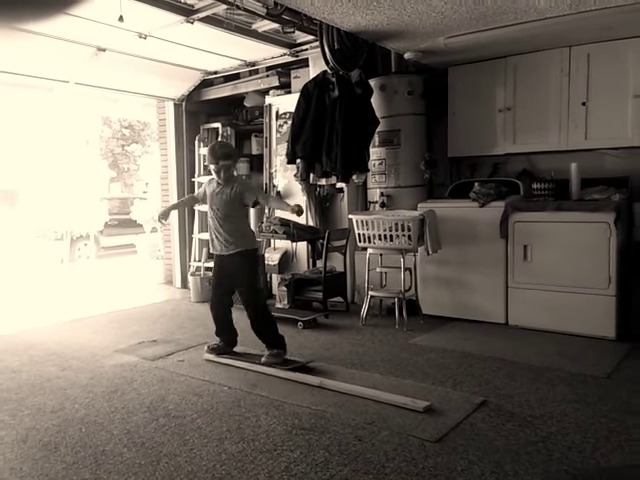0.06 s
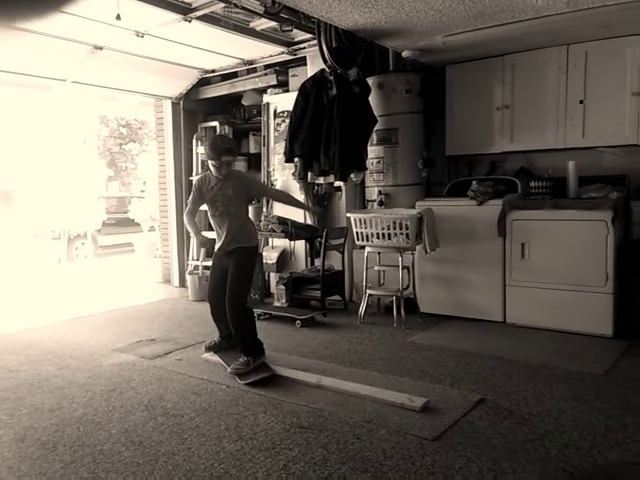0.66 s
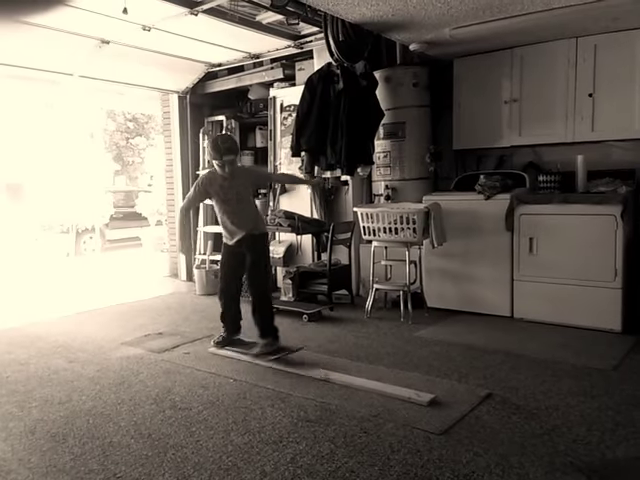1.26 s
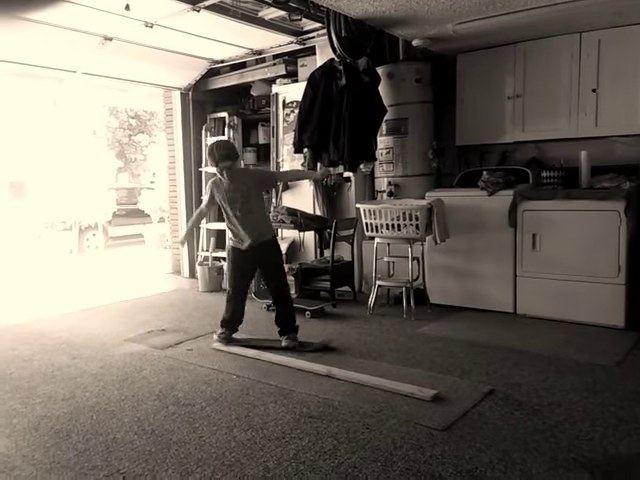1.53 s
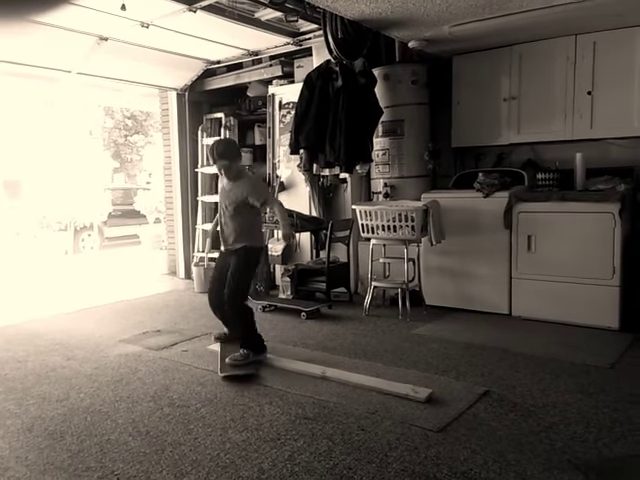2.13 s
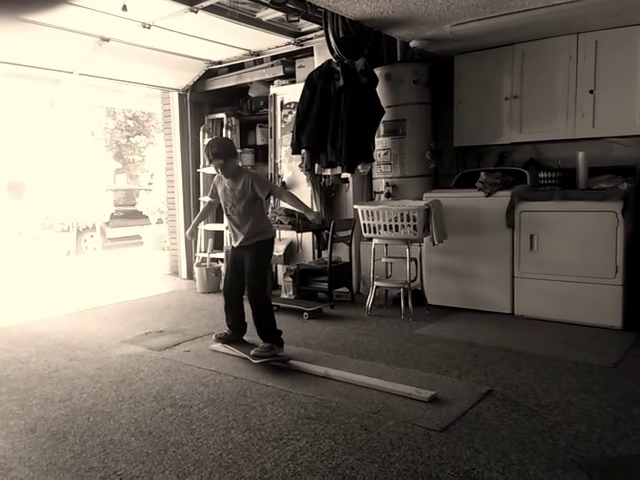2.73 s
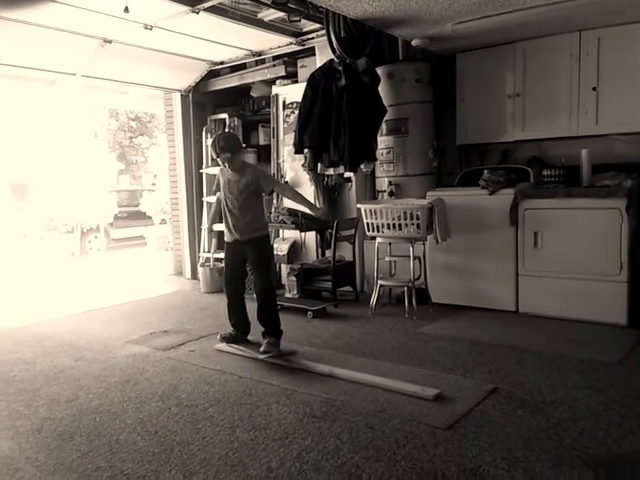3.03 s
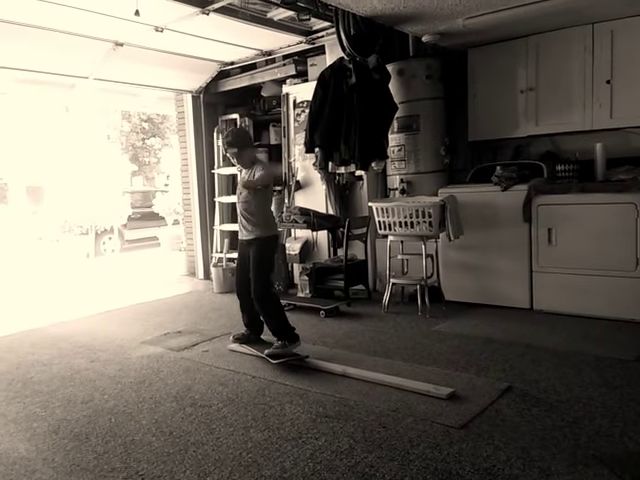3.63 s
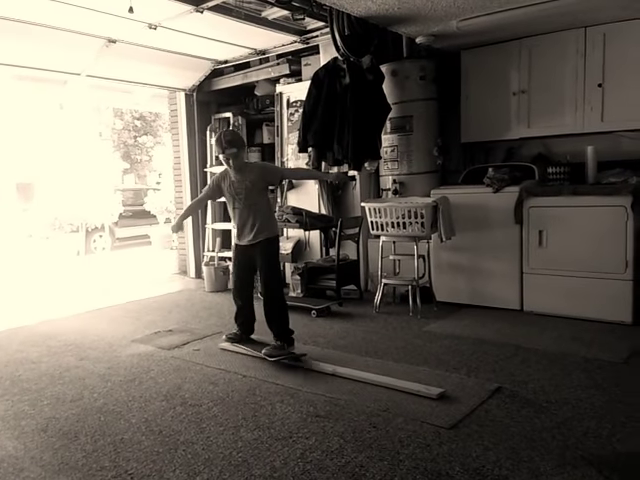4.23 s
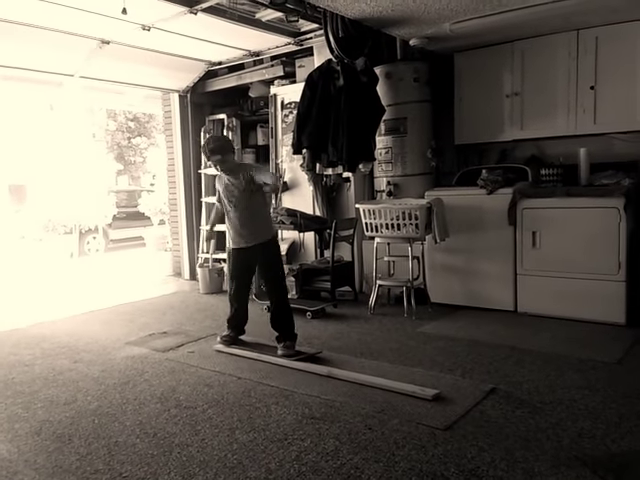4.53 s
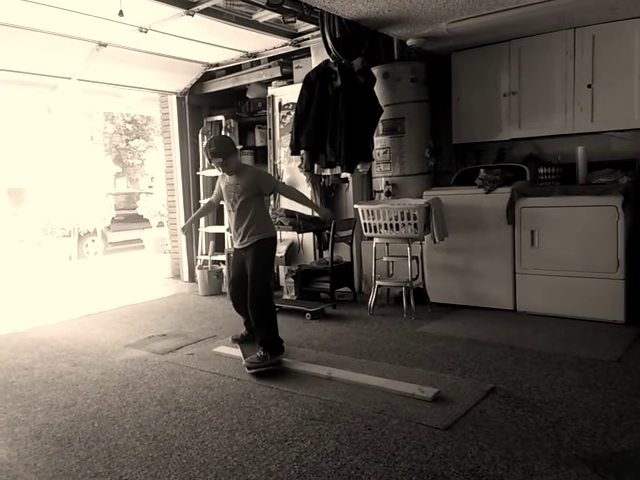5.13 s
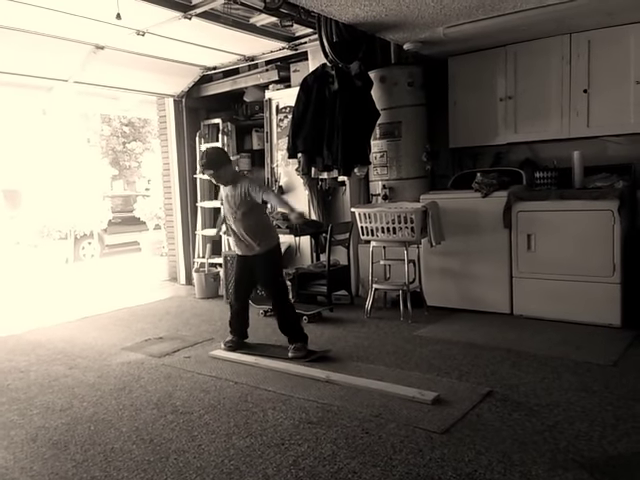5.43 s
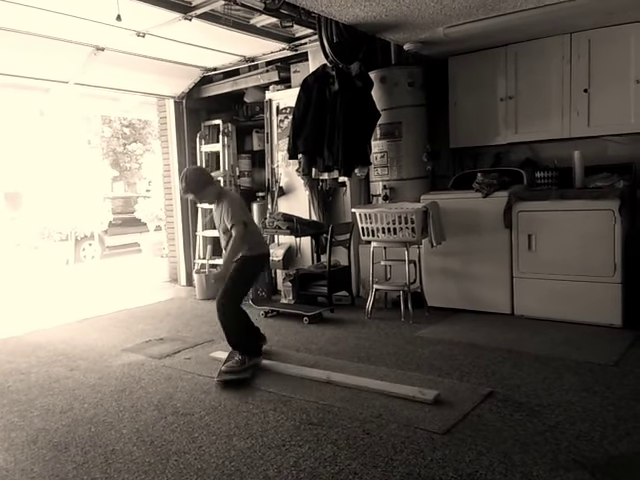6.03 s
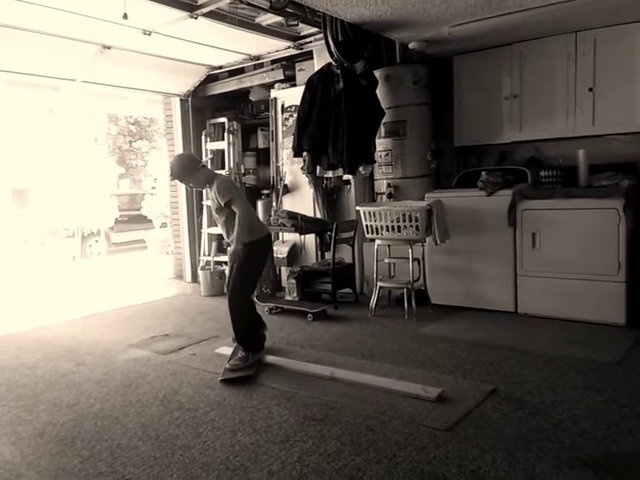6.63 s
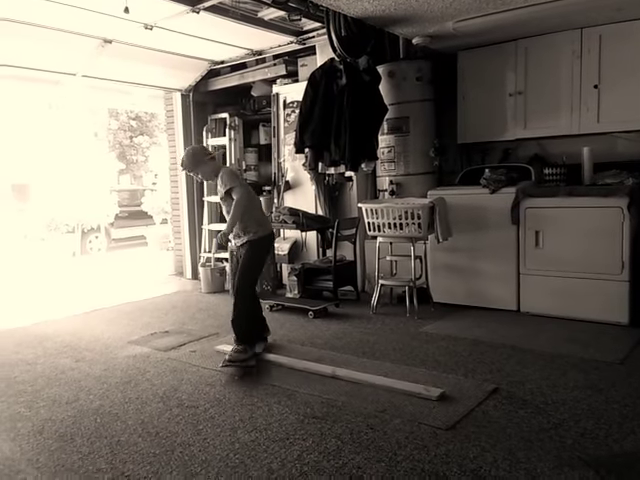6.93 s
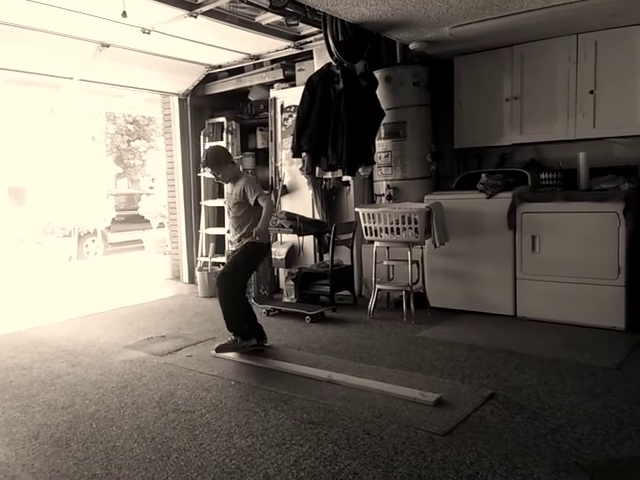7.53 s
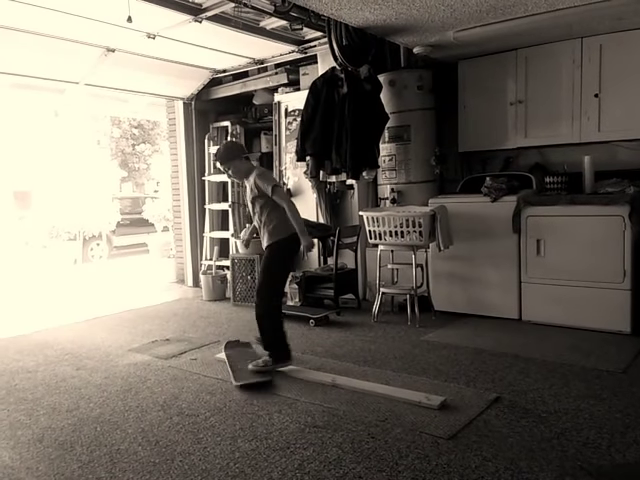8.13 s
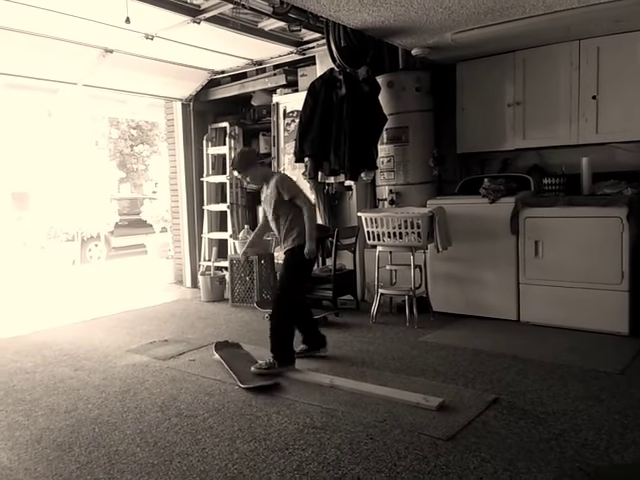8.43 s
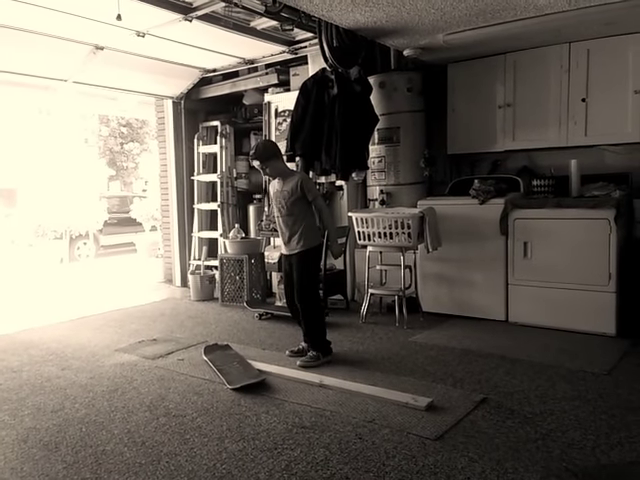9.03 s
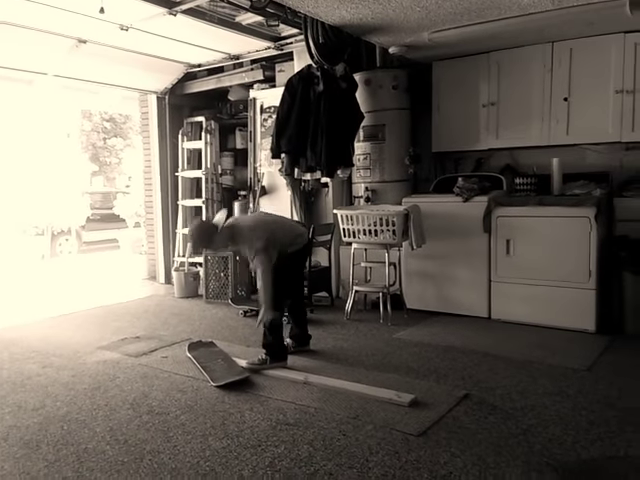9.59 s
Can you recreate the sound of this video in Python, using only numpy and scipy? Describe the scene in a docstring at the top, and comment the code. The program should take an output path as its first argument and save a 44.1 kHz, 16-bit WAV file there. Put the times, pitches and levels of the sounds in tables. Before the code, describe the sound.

In an open garage, a skateboard knocks against a wooden plank and the floor. Sharp clacks come singly or in quick clusters every second or so, with shoes scuffing the grip tape and dull thuds of landings between them. Near the end the board crashes down in a loud clatter, followed by softer steps. The room adds a short echo, over a low appliance hum, soft outdoor air and a faint bird.

```python
"""First you hear a faint bird, a low appliance hum and a sharp clack: a skateboarder is trying tricks
on a wooden plank on the floor of an open garage. Tail, wheels and trucks (the metal axles) knock the
deck and the plank and make them ring. Shoes scuff the grip tape, landings make the floor boom, and a
last flip ends in a loud crash. Echoes in the cluttered room smear each blow."""
import sys
import numpy as np
from scipy import signal
from scipy.fft import rfft, irfft
from scipy.io import wavfile
from scipy.ndimage import uniform_filter1d

SR = 44100
rng = np.random.default_rng(int(sys.argv[2]) if len(sys.argv) > 2 else 0)


def unload_audio(sound):
    """Save the sound as a 16-bit wav file, at the path given as the first command line argument."""
    columns = np.transpose(np.atleast_2d(sound))
    # keep every value between -1 and 1, then stretch to whole-number steps
    steps = np.round(np.clip(columns, -1, 1) * 32767)
    wavfile.write(sys.argv[1], SR, steps.astype(np.int16))


N = 434826
RING_TIME_S = np.arange(int(.8 * SR)) / SR  # time axis for one ring or echo

# tone colour of the outdoor air: frequency_hz, gain_db
AIR_COLOUR = [(20, -27.5), (45, -20), (90, -7.5), (125, -8.5), (150, -12), (188, -2.5), (225, -11.5),
              (345, -14), (420, -20), (900, -20.5), (1250, -23.5), (2060, -28), (3000, -32.5), (5800, -34),
              (8000, -40), (15500, -40)]
# tones of the humming appliance: pitch_hz, level_db
HUM_TONES = [(59.5, -78.5), (119, -66), (193.8, -69.5), (349.9, -75.5)]
# how long the garage's echoes take to fade by 60 dB: frequency_hz, fade_s
ECHO_FADES = [(100, 0.24), (260, 0.37), (700, 0.3), (1800, .27), (5000, 0.24), (12000, 0.13)]
# bird whistles, before scene() turns them down: start_s, length_s, start_pitch_hz, level_db
BIRD_WHISTLES = [(.07, .25, 4580, -62), (0.162, 0.31, 5140, -64.5), (2.78, 0.085, 4840, -70),
                 (2.956, 0.34, 4640, -65.5), (2.991, 0.12, 3650, -58.5), (6.751, 0.31, 4520, -67),
                 (7.376, .06, 4500, -67), (7.581, 0.085, 4220, -62.5), (9.394, 0.28, 4700, -59.5)]
# soles sliding on grip tape and floor: peak_s, half_length_s, hiss_db, pressure (0 to 1)
SHOE_SLIDES = [(.2, 0.3, -66, 0), (.97, 0.16, -76.5, .9), (1.262, 0.061, -65, .85),
               (1.464, 0.057, -47.5, .7), (1.79, 0.086, -75, .7), (2.463, 0.062, -52.5, 0.42),
               (3.06, 0.066, -64, 0.75), (3.635, 0.065, -54, 0.43), (3.915, 0.029, -57.5, 0.42),
               (4.074, 0.055, -64.5, .95), (4.3, 0.21, -59.5, 0.41), (4.454, 0.047, -36, 0.26),
               (4.77, 0.17, -66.5, 0.49), (5.17, 0.17, -57.5, .4), (5.345, 0.065, -43, 0.51),
               (5.968, 0.023, -45, 0.93), (6.858, 0.077, -62.5, 0.88), (7.112, 0.014, -61, 0.55),
               (7.653, .09, -61.5, 0.23), (8.2, 0.25, -55.5, .85), (8.47, 0.3, -64, 0.27),
               (8.956, 0.088, -65, 0.39), (9.75, 0.36, -65.5, 0.02)]
# tone colour of hissing grit: frequency_hz, gain_db
GRIT_COLOUR = [(1000, -16), (2050, -2), (2700, -6), (4300, 0), (6100, 0), (7500, -11), (9000, -25),
               (11000, -43), (15500, -53)]
# tone colour of a sole's low rub: frequency_hz, gain_db
RUB_COLOUR = [(100, -24), (300, 1), (900, 2.5), (1400, 1.5), (2100, 0), (2700, -31.5), (7000, -36.5),
              (11000, -50.5)]
# the rider's weight coming down: start_s, length_s, boom_db, hollow_ring_db
RIDER_LANDINGS = [(1.426, 0.14, -45, -36), (2.095, 0.14, -56.5, -36.5), (4.913, .1, -50.5, -49.5),
                  (5.389, 0.19, -40, -27), (6.0, 0.092, -50, -29.5), (7.88, 0.21, -44, -19.5),
                  (8.2, 0.21, -42.5, -34)]
# tone colour of the booming floor: frequency_hz, gain_db
FLOOR_COLOUR = [(25, -26.5), (50, -19.5), (75, -6.5), (115, 1.5), (160, -8.5), (260, -21), (1000, -69)]
# blows of board and feet: start_s, strength_db, contact_ms, rider_weight_db
BOARD_BLOWS = [(0.3143, -17, 0.27, -2.5), (1.434, -39, 1.95, 13.5), (1.531, -48, 0.95, -10),
               (2.081, -33, 1.23, -9), (2.09, -20, 0.43, 3), (2.122, -30.5, 1.4, 5.5),
               (2.151, -20.5, 0.74, -1), (2.53, -24.5, 0.35, 0.5), (3.264, -36.5, 0.72, -1),
               (4.22, -46.5, 0.71, 9), (4.403, -36, 0.76, -4), (4.873, -40, 1.95, 1),
               (4.918, -15, 0.29, -5.5), (5.284, -32.5, 0.64, 0.5), (5.393, -37, 2.1, 12.5),
               (5.422, -16.5, 0.27, 3.5), (5.93, -51, 1.65, 6), (5.979, -35.5, .85, 5),
               (5.996, -20.5, 0.34, -0.5), (6.044, -27, 0.51, 2.5), (6.921, -49, 1.5, -7),
               (7.813, -24.5, 0.93, -1), (7.843, -17, 0.31, -2.5), (7.879, -27.5, 0.56, 14.5),
               (7.911, -20, 0.35, 1), (7.931, -12, .1, 0.5), (7.95, -19, 0.32, 3.5), (7.972, -17.5, .15, 6),
               (7.989, -15.5, 0.52, -1), (8.145, -40, 0.25, 7.5), (8.18, -42.5, 0.22, 11.5),
               (8.225, -33, 0.66, 4), (8.244, -37.5, 0.33, 10.5), (8.32, -43, 3.5, 6),
               (8.67, -38.5, .95, -2), (8.7, -43, 0.95, 6), (8.83, -43.5, 2.2, -4.5),
               (9.478, -55.5, 0.38, 7.5)]
# tones at which deck, plank and trucks ring: pitch_hz, gain_db, fade_s
BOARD_TONES = [(262, -9, .15), (331, -4, .18), (365, -8, .12), (515, -3, .2), (560, -2, .22),
               (612, -1, .15), (666, -1, .18), (725, 0, .16), (883, -2, .2), (950, -4, .15),
               (1035, -4, .18), (1297, -2, .2), (1507, -1, .2), (1660, -4, .2), (1746, -5, .2),
               (1857, -4, .22), (1966, -5, .22), (2067, -3, .22), (3535, -14, .15), (4097, -12, .18),
               (5623, -15, .15), (6050, -16, .15)]
# tone colour of a crack on wood: frequency_hz, gain_db
WOOD_COLOUR = [(40, -48), (145, -20.5), (190, -9.5), (320, -4), (420, -1.5), (600, -3), (1030, 5),
               (1300, 0.5), (2000, -6), (2650, -6), (4000, 2), (6200, -5.5), (7500, -26), (10000, -43),
               (15500, -53)]
# thump, knock, clack and click of a perfectly hard blow: centre_hz, gain_db, weight_share (0 to 1)
BLOW_BANDS = [(250, -6, 0.99), (630, 2.5, 0.2), (1620, 3.5, 0), (4200, 1, 0.2)]
# borders between those four bands: frequency_hz
BAND_EDGES = (400, 1000, 2400)


def gain(db):
    """Turn decibels into a number to multiply by."""
    return 10 ** (np.asarray(db) / 20)


def level(x, db, first=None):
    """Set a sound's average (rms) level, going by all of it or only its `first` samples."""
    return x * gain(db) / np.sqrt(np.mean(x[:first] ** 2))


def fade(fade_s):
    """A curve that dies away by 60 dB in fade_s."""
    return np.exp(-np.log(1000) * RING_TIME_S / fade_s)


def look_up(table, hz):
    """Read between the rows of a table, spacing all octaves evenly."""
    row_hz, value = np.transpose(table)
    return np.interp(np.log(np.maximum(hz, 1)), np.log(row_hz), value)


def colour(x, table, size=2048):
    """Give a sound a tone colour: make some frequencies louder and others softer."""
    gains = gain(look_up(table, np.fft.rfftfreq(size, 1 / SR)))
    # fold the filter's cepstrum so that it never rings ahead of the sound
    cepstrum = irfft(np.log(gains))
    cepstrum[1:size // 2] *= 2
    cepstrum[size // 2 + 1:] = 0
    return signal.fftconvolve(x, irfft(np.exp(rfft(cepstrum))))[:len(x)]


def split(x, edges_hz, order):
    """Cut a sound into bands from bass to treble."""
    bands = []
    for hz in edges_hz:
        bands.append(signal.sosfilt(signal.butter(order, hz, "low", fs=SR, output="sos"), x))
        x = signal.sosfilt(signal.butter(order, hz, "high", fs=SR, output="sos"), x)
    return bands + [x]


def add(track, start_s, sound):
    """Mix a sound into a track."""
    start = max(int(start_s * SR), 0)
    track[start:start + len(sound)] += sound[:max(N - start, 0)]


def wander(count, smooth_samples):
    """A random wiggle of typical size 1; more smoothing makes it slower."""
    return level(uniform_filter1d(rng.standard_normal(count), smooth_samples), 0)


def outdoor_air(level_db=-60):
    """The air outside is a soft, steady rush."""
    return level(colour(rng.standard_normal(N), AIR_COLOUR), level_db)


def appliance_hum(waver=0.13, smooth_samples=8192):
    """An appliance hums with a few low, slightly unsteady tones."""
    out, t = np.zeros(N), np.arange(N) / SR
    for hz, db in HUM_TONES:
        drift = level(uniform_filter1d(wander(N, smooth_samples), smooth_samples), 0)
        out += level(np.sin(2 * np.pi * hz * t + drift) * (1 + waver * drift), db)
    return out


def bird(drop_share=.27, drop_s=.16, quaver=0.018, flutter_db=4.5):
    """A bird's thin, trembling whistles fall in pitch, quickly at first and then more slowly."""
    out = np.zeros(N)
    for start_s, length_s, start_hz, db in BIRD_WHISTLES:
        progress = np.linspace(0, 1, int(length_s * SR))
        wobble = wander(len(RING_TIME_S), smooth_samples=160)[:len(progress)]
        sag = drop_share * (1 - np.exp(-progress * length_s / drop_s))
        hz = start_hz * (1 - sag) * (1 + quaver * wobble)
        loudness = np.sqrt(progress) * (1 - progress) * gain(flutter_db * wobble)
        add(out, start_s, level(np.sin(2 * np.pi * np.cumsum(hz) / SR) * loudness, db))
    return out


def garage_echoes(spots, early_s=.022, early_db=1.5, alike=0.58, shade=.25):
    """Echoes for each spot in the garage: a burst off floor and cupboards, then a fading tail."""
    edges_hz = 125 * 2. ** np.arange(7)
    centres_hz = np.append(edges_hz, 2 * edges_hz[-1]) / np.sqrt(2)
    # spots close together share part of their echoes
    shared = alike * rng.standard_normal(len(RING_TIME_S))
    echoes = shared + rng.standard_normal((spots, len(RING_TIME_S)))
    # the rider is in the way of the direct sound, so the echoes take a few ms to build up
    echoes *= 1 - shade * np.exp(-RING_TIME_S / 0.0045)
    bands = split(echoes, edges_hz, order=3)
    tail = sum(band * fade(look_up(ECHO_FADES, hz)) for band, hz in zip(bands, centres_hz))
    tail *= gain(early_db * (RING_TIME_S < early_s))
    return tail / np.sqrt(np.sum(tail ** 2, axis=1, keepdims=True))


def settling_slides(delay_s=.17, half_s=0.09, relative_db=-45, pressure=0.34):
    """After each blow the wheels roll and the feet settle: one short slide, louder for a stronger blow."""
    return [(start_s + delay_s, half_s, db + relative_db, pressure) for start_s, db, *_ in BOARD_BLOWS]


def scuffs(grains_per_s=4000, spread_db=4, catch_db=5.5, rub_over_hiss_db=15):
    """Grit catches and slips under soles and wheels: tiny clicks blur into a hiss; pressure adds a rub."""
    grains = (rng.random(N) < grains_per_s / SR) * rng.standard_normal(N)
    grains *= gain(spread_db * rng.standard_normal(N))
    # the sole grips and lets go many times a second
    grains *= gain(catch_db * wander(N, smooth_samples=300))
    hiss, rub = colour(grains, GRIT_COLOUR), colour(grains, RUB_COLOUR)
    out, t = np.zeros(N), np.arange(N) / SR
    for peak_s, half_s, db, pressure in SHOE_SLIDES + settling_slides():
        near = np.abs(t - peak_s) < half_s
        swell = np.cos(np.pi / 2 * (t[near] - peak_s) / half_s) ** 2
        out[near] += swell * (level(hiss[near], db) + pressure * level(rub[near], db + rub_over_hiss_db))
    return out


def landings(hollow_hz=193, hollow_fade_s=0.39):
    """Body weight arrives slowly, so the floor gives a dull boom and the garage a low, hollow ring."""
    out = np.zeros(N)
    for start_s, length_s, boom_db, ring_db in RIDER_LANDINGS:
        push = np.sin(np.linspace(0, np.pi, int(length_s * SR)))
        boom = colour(rng.standard_normal(len(RING_TIME_S)), FLOOR_COLOUR)[-len(push):]
        add(out, start_s, level(boom * push, boom_db))
        # the ring builds up under the push and then fades
        swell = signal.fftconvolve(push[::2] ** 2, fade(hollow_fade_s))[:len(RING_TIME_S)]
        tone = np.sin(2 * np.pi * (hollow_hz * RING_TIME_S + rng.random()))
        add(out, start_s, gain(ring_db) * swell / swell.max() * tone)
    return out


def band_levels(strength_db, contact_ms, weight_db, steepness=2.8):
    """How loud each band of a blow is: longer contact takes away treble, the rider's weight adds thump."""
    hz, hard_db, weight_share = np.transpose(BLOW_BANDS)
    cycles_in_contact = hz * contact_ms / 1000
    dulling_db = 10 * np.log10(1 + cycles_in_contact ** (2 * steepness))
    return strength_db + hard_db + weight_share * weight_db - dulling_db


def skateboard(ring_db=-10, ring_rise_s=0.0027, detune=.003, bounce_gain=.35):
    """Each blow is a sharp crack scattered by the room, plus the ring of deck, plank and trucks."""
    hz, tone_db, fades_s = np.transpose(BOARD_TONES)
    ring_shapes = gain(tone_db)[:, None] * np.array([fade(s) for s in fades_s])
    ring_shapes *= 1 - np.exp(-RING_TIME_S / ring_rise_s)
    cracks = garage_echoes(spots=len(BOARD_BLOWS))
    chances = rng.standard_normal((len(BOARD_BLOWS), 3, len(hz)))
    # a wave runs through the wood and bounces back from the far end a few ms later
    bounce_lags = (SR * rng.uniform(.002, .005, len(BOARD_BLOWS))).astype(int)
    blows = []
    for crack, lag, (bend, place, phase) in zip(cracks, bounce_lags, chances):
        crack = crack + bounce_gain * np.pad(crack, (lag, 0))[:-lag]
        # by chance, the rider's weight bends each pitch and the place struck favours some tones
        bent_hz = hz * (1 + detune * bend)
        tones = np.sin(2 * np.pi * (np.outer(bent_hz, RING_TIME_S) + phase[:, None]))
        ring = gain(2 * place) @ (ring_shapes * tones)
        blows.append(level(colour(crack, WOOD_COLOUR), 0) + level(ring, ring_db))
    out = np.zeros(N)
    for (start_s, *contact), *bands in zip(BOARD_BLOWS, *split(np.array(blows), BAND_EDGES, order=7)):
        for band, db in zip(bands, band_levels(*contact)):
            add(out, start_s, level(band, db, first=1300))
    return out


def scene(bird_db=-5):
    """Blows, landings, scuffs and the far bird sound in the garage, over steady air and hum."""
    echoed = signal.fftconvolve(scuffs() + gain(bird_db) * bird(), garage_echoes(spots=1)[0])[:N]
    return (skateboard() + landings() + echoed + outdoor_air() + appliance_hum())[None]


def record(dry, ceiling=.89, distortion_top_hz=6800, top_hz=15700):
    """The microphone overloads on the hardest blows, and the highest treble is cut away."""
    excess = dry - np.clip(dry, -ceiling, ceiling)
    # the overload comes before the treble roll-off, so its distortion is dulled
    dulled = signal.sosfiltfilt(signal.butter(4, distortion_top_hz, fs=SR, output="sos"), excess)
    treble_cut = signal.ellip(10, .2, 70, top_hz, fs=SR, output="sos")
    return signal.sosfilt(treble_cut, np.clip(dry - dulled, -1, 1))


dry = scene()
out = record(dry)
unload_audio(out)
```